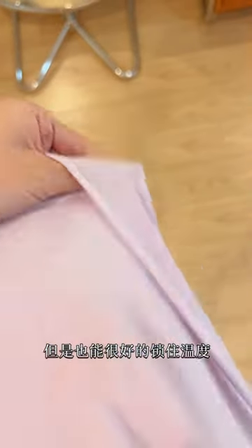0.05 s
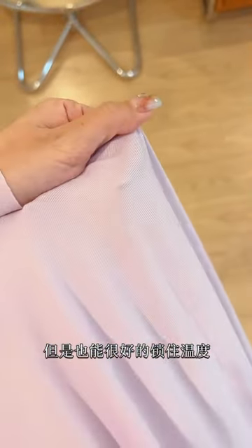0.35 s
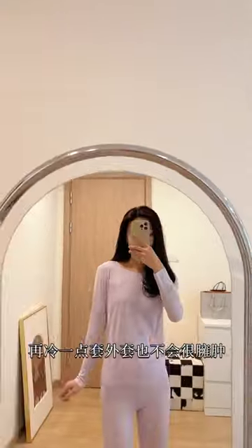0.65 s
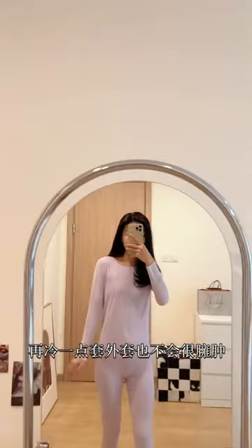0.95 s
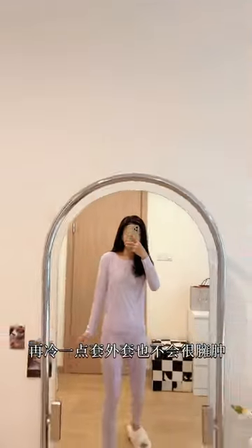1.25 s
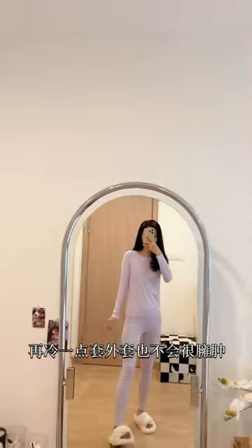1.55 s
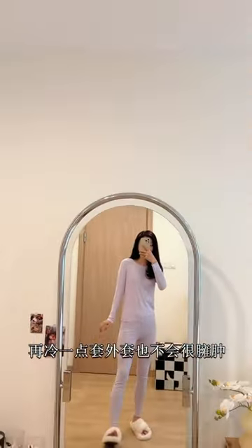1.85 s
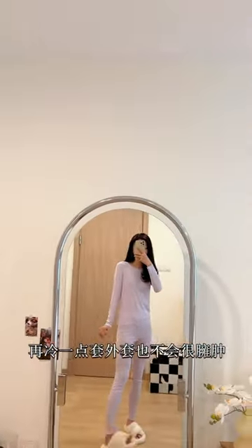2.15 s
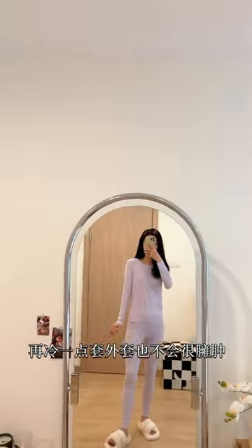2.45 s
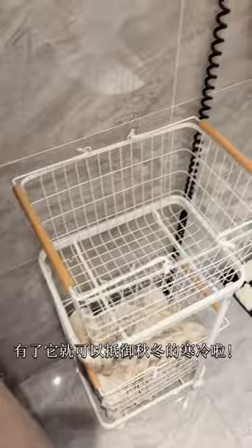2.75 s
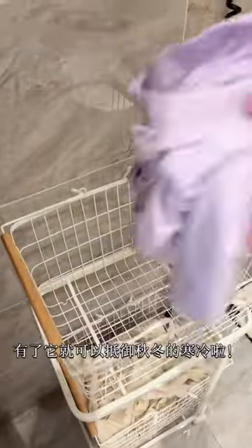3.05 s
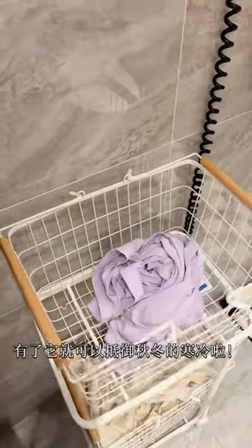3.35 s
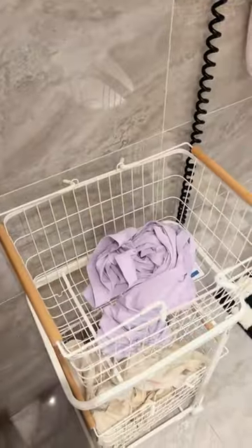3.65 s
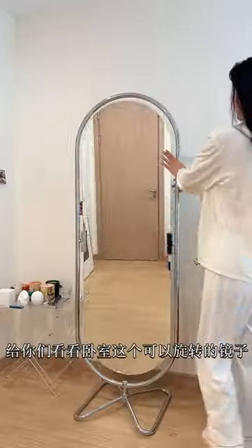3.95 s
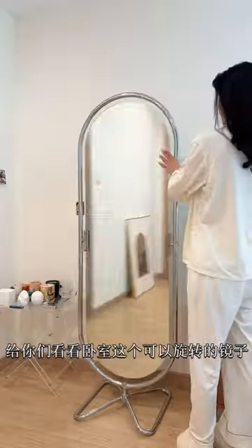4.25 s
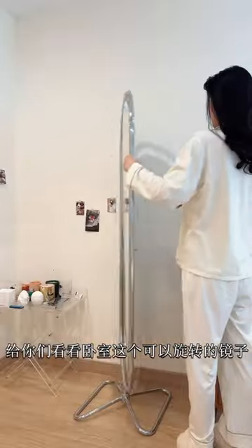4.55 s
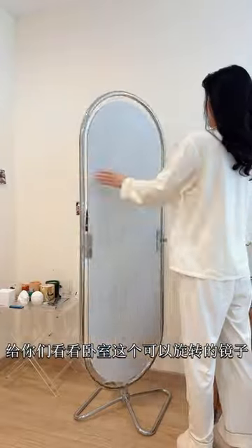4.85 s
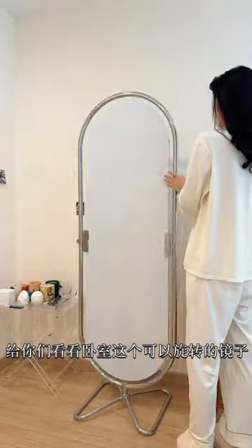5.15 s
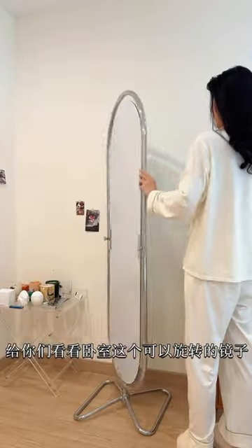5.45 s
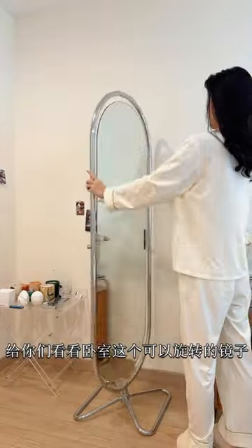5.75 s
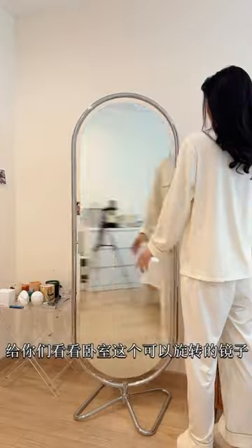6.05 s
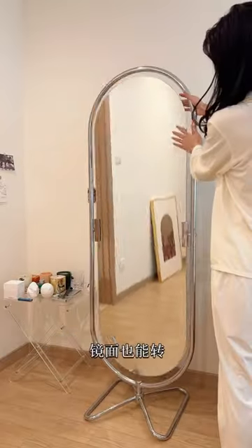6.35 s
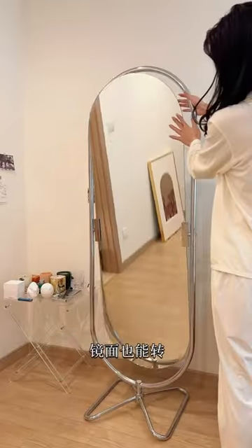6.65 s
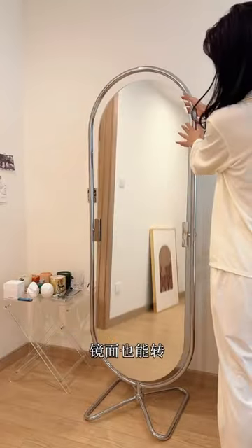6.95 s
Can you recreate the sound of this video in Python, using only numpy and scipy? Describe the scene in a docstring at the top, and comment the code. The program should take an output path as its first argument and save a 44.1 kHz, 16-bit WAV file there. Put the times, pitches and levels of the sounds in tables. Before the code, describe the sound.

Hollow knocks and slipper scuffs on wood, a brief wire basket clash, then hands tapping and rubbing a ringing steel mirror frame.

```python
"""Knocks and slipper scuffs on the wooden floor of a small furnished room, close to a hand-held phone.
Each blow cracks, sounds a hollow body and drags for a moment. A garment drops into a wire basket, whose
wires clash and ring; then a steel-framed mirror is gripped and swivelled, ringing as hands tap and rub it.
Soles and the dry pivot squeak faintly, cloth rustles, and the hand on the phone rumbles over quiet air."""
import sys
import numpy as np
from scipy import signal
from scipy.fft import rfft, irfft
from scipy.io import wavfile

SR = 44100
rng = np.random.default_rng(int(sys.argv[2]) if len(sys.argv) > 2 else 0)


def file_out(sig):
    """Save sig as 16-bit WAV at sys.argv[1]."""
    # one column per channel
    cols = np.atleast_2d(sig).T
    # limit, then scale
    lim = np.clip(cols, -1, 1)
    pcm = np.round(lim * 32767).astype(np.int16)
    wavfile.write(sys.argv[1], SR, pcm)


N = 309141
TIME = np.arange(N) / SR

# spectrum of the room air: (frequency [Hz], level [dB])
AIR_SPECTRUM = [(25, -3), (70, -2.5), (100, -3), (135, -1), (205, -0.5), (275, -4.5), (745, -12),
                (1560, -18), (4700, -23.5), (8000, -24), (9600, -33.5), (12400, -29.5), (13500, -43.5)]
# slow drift of the room air: (time [s], level [dB])
AIR_LEVELS = [(0, -53), (.45, -57), (1.2, -54.5), (1.85, -58.5), (2.75, -54.5), (3.6, -55.5), (4.15, -57.5),
              (4.5, -55), (5.8, -54.5), (6.25, -58), (7.0, -54)]
# the room air dips briefly: (start [s], end [s])
AIR_DIPS = [(0.57, 0.64), (3.676, 3.748), (6.284, 6.316)]
# soft thuds of the floor and the mirror's stand, and the low, late pitch of the hard blow at 0.944 s: (start
# [s], level [dB], pitch [Hz])
SOFT_THUDS = [(.016, -34.5, 136), (0.9456, -19.5, 246), (2.732, -46, 77), (3.172, -24, 125.7),
              (3.866, -36, 135), (4.836, -36.5, 153), (6.551, -43.5, 197)]
# feet landing and things set down: (start [s], level [dB], pitch [Hz], time to peak [s],
# crack [dB re level], drag [dB re level], drag fall [s], grit [dB re drag])
BLOWS = [(.847, -29, 323, 0.0095, -40, -3, 0.11, -9.5), (0.9438, -9, 420, 0.0059, -9.5, -15, 0.036, -9.5),
         (1.229, -24.5, 378.4, .025, -38, -5, .052, -8.5), (3.177, -15, 380, .0012, -18, -6.5, 0.063, -5.5),
         (3.189, -12, 385, 0.0078, -31, -13, 0.028, -9),
         (3.8356, -19.5, 490, .0018, -11.5, -5, 0.041, -12.5),
         (3.871, -23, 490, 0.0088, -6, -2.5, 0.021, -17), (4.0217, -17, 409, 0.00454, -9, -7.5, 0.024, -13),
         (5.008, -42, 390, 0.0032, -37, -3, 0.011, -3)]
# spectrum of a blow's crack: (frequency [Hz], level [dB])
CRACK_SPECTRUM = [(200, -14), (700, 23.5), (1400, 7), (2300, 5), (3500, -10), (5000, -25), (13000, -74)]
# the hand shifting on the phone: (time [s], level [dB], length [s])
HAND_SHIFTS = [(.03, -42, 0.062), (.214, -54.5, 0.088), (.555, -50, 0.012), (.925, -44, 0.057),
               (3.208, -41, 0.12), (3.9, -50, 0.15), (4.849, -56, 0.11)]
# cloth brushing: (time [s], level [dB], length [s], low edge [Hz], top edge [Hz])
CLOTH_BRUSHES = [(0.089, -51.5, 0.055, 1200, 12100), (1.475, -41, 0.028, 1500, 4240),
                 (2.999, -62.5, 0.28, 1200, 10800), (3.067, -48, 0.044, 700, 7630),
                 (3.278, -36.5, 0.035, 500, 4930), (3.321, -54.5, 0.13, 1140, 2670),
                 (3.866, -51.5, 0.087, 2980, 8400), (3.976, -42, 0.027, 3470, 10600),
                 (4.053, -46, 0.032, 2500, 7560), (4.349, -58.5, 0.19, 3500, 7760),
                 (4.55, -36.5, 0.026, 4000, 7060)]
# soles and the dry pivot squeaking:
# (time [s], level [dB], length [s], pitch [Hz], width [Hz], left minus right [dB])
DRY_SQUEAKS = [(0.09, -53.5, 0.038, 2460, 500, 0), (1.472, -35, 0.011, 2400, 610, -6),
               (1.86, -63.5, 0.061, 2690, 504, -7), (4.837, -41, 0.023, 5640, 52, 13),
               (5.793, -42.5, 0.04, 8960, 60, 4), (5.779, -52, 0.044, 9800, 510, -2)]
# soles sliding over wood: (time [s], level [dB], length [s], pitch [Hz], grit [dB re level])
SOLE_SCUFFS = [(.700, -47.5, 0.066, 385, -3), (0.984, -29, 0.05, 450, -12.5), (1.031, -41, .05, 560, -35),
               (1.244, -32, 0.044, 774, -11.5), (1.38, -47, 0.19, 226, -16), (1.6, -42, 0.078, 443, 0),
               (2.441, -53, 0.17, 340, 1), (2.772, -51, 0.065, 254, -13), (4.041, -28, 0.04, 546, -4),
               (5.801, -51.5, 0.017, 710, 15), (5.876, -50, .016, 710, -7), (6.61, -46.5, 0.11, 168, -14)]
# spectrum of the grit in a drag: (frequency [Hz], level [dB])
GRIT_SPECTRUM = [(150, -12), (500, -48.5), (900, 4.5), (1500, -3.5), (2700, -0.5), (4500, -9), (7500, -20),
                 (13000, -37)]
# basket wires clashing: (time [s], level [dB], rise [s], fall [s], treble [dB])
WIRE_CLASHES = [(3.182, -22, 0.0079, 0.043, -1.5), (3.233, -22, 0.0049, 0.021, 3.5)]
# spectrum of wire striking wire: (frequency [Hz], level [dB])
CLASH_SPECTRUM = [(150, -7), (600, -3.5), (2000, -1.5), (3500, -5.5), (5500, -13.5), (9000, -13.5),
                  (13000, -27)]
# resonances of the basket's wires: (frequency [Hz], width [Hz], level [dB])
WIRE_MODES = [(2380, 59, -7), (3780, 53, -11), (4310, 23, -1), (5030, 140, -3.5), (6290, 130, 2),
              (7690, 270, 3.5), (8600, 100, 1), (9430, 82, 5.5), (11300, 240, 6.5), (11700, 40, 5),
              (11700, 90, 8), (12800, 110, 14.5)]
# hands on the mirror's frame: (time [s], level [dB], length [s], top edge [Hz])
FRAME_GRIPS = [(3.996, -28.5, 0.023, 9300), (4.542, -39, .028, 9400), (4.622, -43.5, .07, 3930),
               (4.831, -52, .02, 10300), (5.185, -37, 0.035, 4170), (5.26, -40.5, 0.027, 4384),
               (5.286, -33, 0.026, 5230), (5.377, -41, .066, 4000), (5.456, -42, .058, 5530),
               (6.386, -47.5, 0.056, 6660), (6.457, -48.5, 0.065, 6100), (6.546, -29, 0.042, 13000),
               (6.754, -55, 0.048, 7000), (6.95, -24, 0.044, 10500)]
# spectrum of fingers rubbing steel: (frequency [Hz], level [dB])
RUB_SPECTRUM = [(150, -16.5), (700, -23.5), (1100, -17.5), (1700, -7.5), (3000, -5.5), (6500, -7),
                (9000, -7.5), (13000, -16.5)]
# resonances of the mirror's frame: (frequency [Hz], width [Hz], level [dB])
FRAME_MODES = [(1007, 20, -5.5), (1520, 18, -3.5), (1700, 100, -8), (1946, 7.2, 2.5), (2140, 22, 0.5),
               (2377, 20, 0), (2550, 27, -12), (2660, 11, -4), (2954, 14, -8), (3440, 12, 2),
               (3990, 7.4, -5), (4290, 14, 0), (4400, 30, -17), (5060, 13, 4), (5630, 19, -2.5),
               (6030, 140, -4), (6620, 88, -0.5), (7040, 33, 0), (7800, 220, -8), (8750, 58, -12),
               (8800, 53, -22), (11800, 130, 5)]


def amp(db):
    """Decibels to gain."""
    return 10 ** (np.asarray(db) / 20)


def unit(x):
    """Scale to rms 1."""
    return x / np.sqrt(np.mean(x ** 2) + 1e-20)


def pan(pan_db):
    """Left and right gains, with the left louder by pan_db."""
    return amp([[pan_db / 2], [-pan_db / 2]])


def colour(x, points):
    """Shape a steady signal by (frequency [Hz], level [dB]) points."""
    hz, db = np.transpose(points)
    bins_hz = np.fft.rfftfreq(x.shape[-1], 1 / SR)
    gain = amp(np.interp(np.log(bins_hz + 1), np.log(hz), db))
    return irfft(rfft(x) * gain, x.shape[-1])


def ring(x, modes):
    """Pass a signal through (frequency [Hz], width [Hz], level [dB]) resonances."""
    return sum(amp(db) * signal.lfilter(*signal.iirpeak(hz, hz / width, fs=SR), x)
               for hz, width, db in modes)


def edge(x, hz, kind, order):
    """Low-pass or high-pass."""
    return signal.sosfilt(signal.butter(order, hz, kind, fs=SR, output="sos"), x)


def slips(rate, spread_db):
    """One second of tiny collisions between two surfaces, their sizes scattered by spread_db."""
    hit = rng.random(SR) < rate / SR
    return hit * rng.choice([-1, 1], SR) * amp(spread_db * np.clip(rng.standard_normal(SR), -2, 2))


def split(length, rise_share):
    """Divide a contact's length into rise and fall; the rise takes at most nine tenths."""
    rise = length * min(rise_share, .9)
    return rise, length - rise


def add_contact(out, x, peak_s, db, rise, fall, pan_db):
    """Place a contact whose force builds up to peak_s and then lets go."""
    offsets = np.arange(len(x)) - len(x) // 2
    t = offsets / SR
    force = np.exp(-np.where(t < 0, np.abs(t / rise) ** 1.3, np.abs(t / fall) ** 1.25))
    at = int(peak_s * SR) + offsets
    inside = (at >= 0) & (at < N)
    out[:, at[inside]] += amp(db) * pan(pan_db) * (unit(x) * force)[inside]


def room(x, early_db, early_s, late_db, t60, shared=0):
    """Near surfaces scatter the sound at once and widen it; the furnished room adds a short, dull tail."""
    t = TIME[:SR // 2]
    mid, side = rng.standard_normal((2, len(t))) * np.exp(-t / early_s) * (t > .0005)
    early = unit(shared * mid + np.array([side, -side]))
    late = rng.standard_normal((2, len(t))) * np.exp(-np.log(1000) * t / t60)
    echoes = amp(early_db) * early + amp(late_db) * edge(unit(late), 1500, "low", order=2)
    wet = signal.fftconvolve(x, echoes / np.sqrt(len(t)), axes=1)[:, :N]
    return (x + wet) / np.sqrt(1 + amp(early_db) ** 2)


def air_level(dip_db=-30, fade_s=.023, return_db=6.5, settle_s=.04):
    """The air's level in dB drifts and dips; after each dip it returns a little louder and settles."""
    db = np.interp(TIME, *np.transpose(AIR_LEVELS))
    for start, end in AIR_DIPS:
        db += dip_db * np.clip(np.minimum(TIME - start, end - TIME) / fade_s, 0, 1)
        db += return_db * (TIME > end) * np.exp(-np.abs(TIME - end) / settle_s)
    return db


def air(waver_db=.8):
    """Room tone all round the microphone: a wavering rumble near the centre and a wide hiss."""
    mid, side = edge(colour(rng.standard_normal((2, N)), AIR_SPECTRUM), 28, "high", order=1)
    side = colour(side, [(60, -7.5), (250, -1.5), (1000, 0), (8000, 0)])
    knots = np.linspace(0, TIME[-1], 100)
    waver = waver_db * np.interp(TIME, knots, rng.standard_normal(len(knots)))
    return unit(np.array([mid + side, mid - side])) * amp(air_level() + waver) * pan(1)


def struck_body(hz, peak_s, sag, overtone_db=-21):
    """A struck body swells and fades; its pitch sags as the contact relaxes, passing hz at the peak."""
    age = TIME[:SR // 2] / peak_s
    pitch = hz * (1 + min(sag, 1) * (2 * np.exp(-age) - 1 + np.exp(-1)))
    phase = 2 * np.pi * np.cumsum(pitch) / SR
    swell = (age * np.exp(1 - age)) ** 2
    return (np.sin(phase) + amp(overtone_db) * np.sin(2 * phase)) * swell


def knocks(thud_cycles=2.5, hard_db=-10, hard_sag=.31, sag_growth_per_db=.6, pan_db=5):
    """Left of the microphone a blow cracks and the body sounds; a soft thud is the body alone."""
    out = np.zeros((2, N + SR))
    bodies = [(start, db, struck_body(hz, thud_cycles / hz, sag=.066)) for start, db, hz in SOFT_THUDS]
    for start, db, hz, peak_s, crack_db, *_ in BLOWS:
        sag = hard_sag * np.exp(sag_growth_per_db * (db - hard_db))  # harder blows sag further
        bodies.append((start, db, struck_body(hz, peak_s, sag)))
        crack = colour(slips(rate=24000, spread_db=.5), CRACK_SPECTRUM)
        add_contact(out, crack, start + .001296, db + crack_db, rise=.0009, fall=.006, pan_db=pan_db)
    for start, db, body in bodies:
        at = int(start * SR)
        out[:, at:at + len(body)] += amp(db) * pan(pan_db) * body
    return room(out[:, :N], early_db=-10, early_s=.006, late_db=-17, t60=.22)


def handling():
    """Soft rumbles pass from the hand straight into the phone's microphone, with no room on them."""
    out = np.zeros((2, N))
    for time, db, length in HAND_SHIFTS:
        rumble = edge(rng.standard_normal(SR), 90, "low", order=3)
        rumble = edge(rumble, 20, "high", order=2)
        add_contact(out, rumble, time, db, *split(length, rise_share=.39), pan_db=3.5)
    return out


def cloth():
    """Fibres slide over each other in a dense, soft hiss, a little to the left."""
    out = np.zeros((2, N))
    for time, db, length, low_hz, top_hz in CLOTH_BRUSHES:
        fibres = edge(slips(rate=4400, spread_db=3), low_hz, "high", order=2)
        fibres = edge(fibres, top_hz, "low", order=8)
        add_contact(out, fibres, time, db, *split(length, rise_share=.43), pan_db=2.5)
    return room(out, early_db=-2, early_s=.003, late_db=-10, t60=.2)


def squeaks():
    """A sole or the dry pivot sticks and slips, and sings briefly on an unsteady pitch."""
    out = np.zeros((2, N))
    for time, db, length, hz, width_hz, pan_db in DRY_SQUEAKS:
        wander = unit(edge(rng.standard_normal(SR), width_hz, "low", order=2))
        tone = np.sin(2 * np.pi * np.cumsum(hz + wander * width_hz / 2) / SR)
        add_contact(out, tone, time, db, *split(length, rise_share=.34), pan_db)
    return room(out, early_db=-5, early_s=.004, late_db=-15, t60=.2)


def scuffs(width_share=.99, boards_db=-9, body_top_hz=1100):
    """Sliding soles and dragging blows shake a hollow wooden body and the boards, with dry grit above."""
    out = np.zeros((2, N))
    contacts = [(time, db, *split(length, rise_share=.49), hz, grit_db)
                for time, db, length, hz, grit_db in SOLE_SCUFFS]
    for start, db, hz, peak_s, _, drag_db, fall, grit_db in BLOWS:
        rise = .002 + .36 * peak_s  # the softer a blow lands, the slower its drag builds
        contacts.append((start + rise, db + drag_db, rise, fall, hz, grit_db))
    for time, db, rise, fall, hz, grit_db in contacts:
        drag = slips(rate=5000, spread_db=0)
        mode = [(hz, hz * width_share, 0)]
        body = unit(edge(ring(ring(drag, mode), mode), body_top_hz, "low", order=3))
        boards = ring(slips(rate=3600, spread_db=10), [(217, 140, 0)])
        boards = amp(boards_db) * unit(edge(boards, 250, "low", order=2))
        grit = amp(grit_db) * unit(colour(drag, GRIT_SPECTRUM))
        add_contact(out, body + boards + grit, time, db, rise, fall, pan_db=.2)
    return room(out, early_db=-3.5, early_s=.005, late_db=-16, t60=.18)


def basket(ring_db=8, direct_db=-1):
    """The garment sets the wires ringing; the basket drops on to its rack in a shorter, brighter clash."""
    out = np.zeros((2, N))
    for time, db, rise, fall, treble_db in WIRE_CLASHES:
        clash = colour(slips(rate=6000, spread_db=8.5), CLASH_SPECTRUM)
        clash = colour(clash, [(1000, .0089), (9000, treble_db)])  # each clash has its own brightness
        add_contact(out, clash, time, db, rise, fall, pan_db=0)
    wires = amp(direct_db) * out + amp(ring_db) * ring(out, WIRE_MODES)
    return room(wires, early_db=0, early_s=.0072, late_db=-9, t60=.245, shared=.77)


def mirror(ring_db=6, mode_spread_db=5, gradual_s=.2):
    """Fingers catch and slip on the steel tube and make it ring; some touches are dull, others bright."""
    out = np.zeros((2, N))
    for time, db, length, top_hz in FRAME_GRIPS:
        touch = edge(colour(slips(rate=7000, spread_db=3), RUB_SPECTRUM), top_hz, "low", order=4)
        # each place of contact favours other modes
        modes = [(hz, width, mode_db + mode_spread_db * rng.uniform(-1, 1))
                 for hz, width, mode_db in FRAME_MODES]
        rise, fall = split(length, length / gradual_s)  # a tap lands at once, a longer touch builds
        add_contact(out, touch + amp(ring_db) * ring(touch, modes), time, db, rise, fall, pan_db=2.5)
    return room(out + frame_slide(), early_db=1.5, early_s=.0025, late_db=5, t60=.12, shared=.49)


def frame_slide(start_s=5.07, stop_s=5.85, attack_s=.1, release_s=.023, db=-56.5, db_per_s=5):
    """The turning frame slides through a juddering grip that takes hold, tightens and lets go."""
    judder_db = 2 * unit(edge(rng.standard_normal(N), 29, "low", order=2))
    catches = np.concatenate([slips(rate=3400, spread_db=.5) for _ in range(N // SR + 1)])[:N]
    rub = edge(colour(catches, RUB_SPECTRUM), 7500, "low", order=8)
    ringing = unit(rub + amp(10) * ring(rub, FRAME_MODES))
    held_s = np.clip(TIME, start_s, stop_s) - start_s
    attack = np.minimum(held_s / attack_s, 1)
    release = np.exp(-np.maximum(TIME - stop_s, 0) / release_s)
    return ringing * attack * release * amp(db + db_per_s * held_s + judder_db)


def scene():
    """The small room as heard from where the phone is held."""
    return air() + knocks() + handling() + cloth() + squeaks() + scuffs() + basket() + mirror()


def record(dry, top_hz=13600):
    """The phone cuts the top steeply."""
    return signal.sosfilt(signal.ellip(10, .2, 80, top_hz, fs=SR, output="sos"), dry)


dry = scene()
out = record(dry)
file_out(out)
```